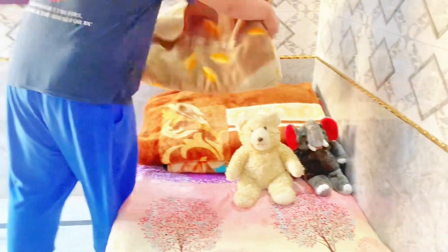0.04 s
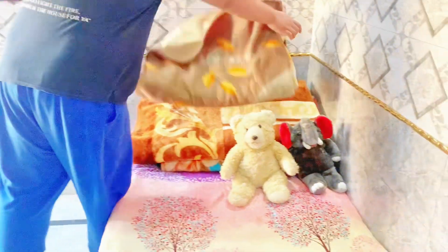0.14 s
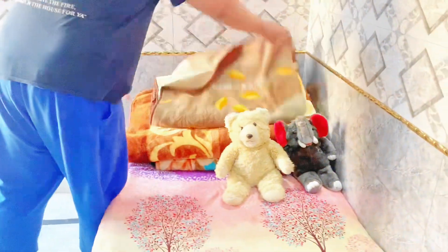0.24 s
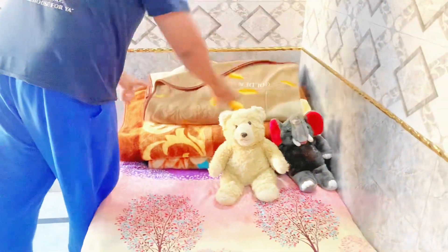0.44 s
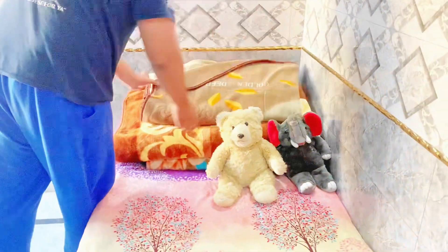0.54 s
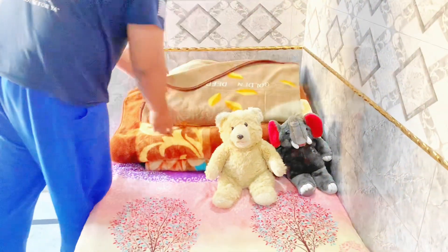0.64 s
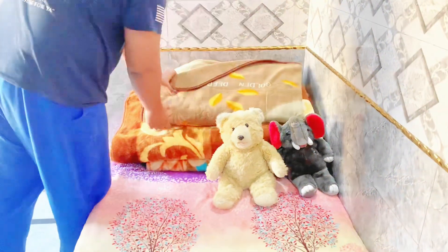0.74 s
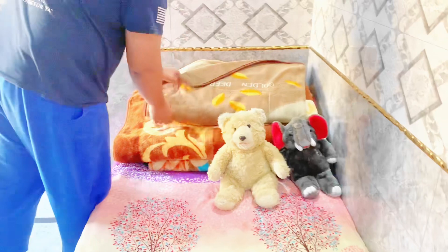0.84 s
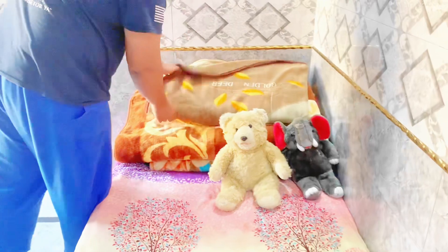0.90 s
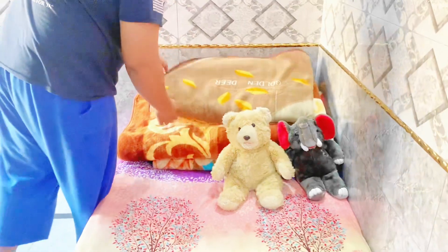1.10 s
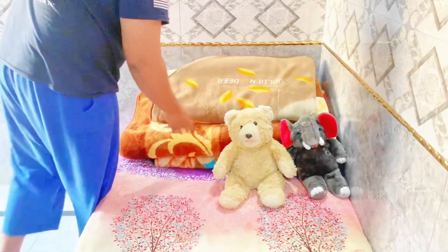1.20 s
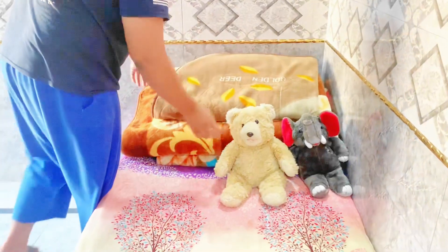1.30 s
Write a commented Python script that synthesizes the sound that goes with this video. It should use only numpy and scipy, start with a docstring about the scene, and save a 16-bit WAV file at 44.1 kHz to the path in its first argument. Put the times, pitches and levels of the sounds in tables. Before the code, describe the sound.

A folded blanket lands on a stack of bedding at about 0.25 seconds, after a faint brush of cloth. It makes a soft, low thump with a brief swish, and a fold flops down more quietly near 0.4 seconds. Hands then rub the fabric faintly, with light scuffs from about 0.9 to 1.3 seconds. A low machine hum and the bedroom's hush continue underneath.

```python
"""Blanket landing on bedding

A folded blanket lands on a stack of bedding in the corner of a quiet tiled bedroom. The trapped air
gives a soft thump that sets bed and room booming, slipping fibres hiss as the cloth settles, and a
last fold flops down. Faint rubbing comes before and after, over a machine's hum and the room's hush."""
import sys
import numpy as np
from scipy import signal
from scipy.fft import rfft, irfft
from scipy.io import wavfile

SR = 44100
rng = np.random.default_rng(int(sys.argv[2]) if len(sys.argv) > 2 else 0)


def int16_out(signal):
    """Quantize to a 16-bit WAV file."""
    q = np.round(np.clip(np.atleast_2d(signal).T, -1, 1) * 32767)
    wavfile.write(sys.argv[1], SR, q.astype(np.int16))


N = 59535
T = np.arange(N) / SR

# spectrum of the cloth's finest friction noise: frequency_hz, relative_db
FIZZ_SPECTRUM = [(500, -35), (3000, -24), (8500, -3), (10200, 1), (11500, -4), (13000, 2), (13700, 4),
                 (14200, -6), (15800, -9)]


def amp(db):
    """Amplitude ratio of a level in decibels."""
    return 10 ** (np.asarray(db) / 20)


def unit(x):
    """Normalisation to an rms of 1."""
    return x / np.sqrt(np.mean(x ** 2) + 1e-20)


def spectrum_db(points, hz):
    """Interpolation of a spectrum on a logarithmic frequency axis."""
    frequencies, db = np.transpose(points)
    return np.interp(np.log(hz + 1), np.log(frequencies + 1), db)


def bands_db(bands, hz):
    """Gaussian peaks or dips of a frequency response, summed in decibels."""
    return sum(db * np.exp(-((hz - centre) / width) ** 2) for centre, width, db in bands)


def colour(x, db_at):
    """Zero-phase filtering by a gain in decibels at each frequency."""
    hz = np.fft.rfftfreq(2 * N, 1 / SR)
    return irfft(rfft(x, 2 * N) * amp(db_at(hz)))[:N]


def swell(peak_s, rise_s, fade_s):
    """Gaussian envelope with separate widths before and after its peak."""
    return np.exp(-((T - peak_s) / np.where(T < peak_s, rise_s, fade_s)) ** 2)


def drift(top_hz):
    """Superposed slow sinusoids wander at random, with an rms of about 1."""
    rate, phase = rng.random((2, 16, 1))
    return np.sin(2 * np.pi * (top_hz * rate * T + phase)).sum(0) / np.sqrt(len(rate) / 2)


def friction(spectrum, hiss_share):
    """Shot noise: countless tiny fibre slips share their power with an even hiss."""
    slips_per_s, spread_db = 5500, 3.5
    slips = (rng.random(N) < slips_per_s / SR) * rng.choice([-1., 1.], N)
    slips *= amp(spread_db * np.minimum(rng.exponential(1, N), 4))
    drive = np.sqrt(1 - hiss_share) * unit(slips) + np.sqrt(hiss_share) * rng.standard_normal(N)
    return unit(colour(drive, lambda hz: spectrum_db(spectrum, hz)))


def strokes(events, spectrum):
    """Incoherent addition: overlapping swells of noise sum in power."""
    power = sum((amp(db) * swell(peak, rise, fade)) ** 2 for peak, db, rise, fade in events)
    return np.sqrt(power) * friction(spectrum, hiss_share=0.67)


def room(x, t60_s=.3, tail_db=-16):
    """Reverberation: early reflections and a faint, exponentially decaying tail follow the sound."""
    # first reflections from the tiled corner: delay_s, gain_db
    reflections = [(.0023, -15), (.0041, -15), (.0058, -16), (.0087, -16)]
    t = T[:SR // 2]
    tail = rng.standard_normal(len(t)) * (rng.random(len(t)) < .05) * amp(-60 * t / t60_s)
    response = amp(tail_db) * tail / np.linalg.norm(tail)
    response[0] = 1  # direct sound
    for delay, db in reflections:
        response[round(delay * SR)] += amp(db) * rng.choice([-1, 1])
    return signal.fftconvolve(x, response / np.linalg.norm(response))[:N]


def hush(level_db=-49):
    """Stationary ambient noise, strongest in the bass."""
    # background of the room: frequency_hz, relative_db
    spectrum = [(15, -38), (28, -13), (45, 0), (65, -5), (82, -7), (150, -7), (240, -9), (370, -10),
                (460, -16), (700, -20.5), (1100, -18), (1500, -25), (1900, -22.5), (3800, -30.5),
                (4800, -31.5), (5700, -36), (7500, -40.5), (10200, -42), (15500, -53)]
    return amp(level_db) * unit(colour(rng.standard_normal(N), lambda hz: spectrum_db(spectrum, hz)))


def hum(waver_depth=0.45, waver_hz=3.12):
    """Random modulation: a household machine's tones waver in amplitude and phase."""
    # tones of the machine: pitch_hz, rms_level_db
    tones = [(48.8, -49.5), (65.3, -49), (99.6, -56.5), (149.5, -59), (220, -64.5), (299.4, -57.5),
             (340, -65.5), (370, -68), (499.5, -76), (1329, -79.5), (8250, -81)]
    out = np.zeros(N)
    for hz, db in tones:
        waver = 1 + waver_depth * (drift(waver_hz) + 1j * drift(waver_hz))
        carrier = np.exp(2j * np.pi * (hz * T + rng.random()))
        out += amp(db) * unit((waver * carrier).real)
    return out


def hands():
    """Sliding friction of hands and sleeves on the blanket gives midrange noise."""
    # long rubs: peak_s, level_db, rise_s, fade_s
    rubs = [(.015, -54.5, 0.11, 0.074), (.42, -60, 0.39, 0.016), (1.13, -57, 0.25, 0.28)]
    # their dull spectrum: frequency_hz, relative_db
    rub_spectrum = [(150, -15), (400, 11.5), (700, 2.5), (1100, 0), (1550, -1.5), (2000, 0), (3500, -4.5),
                    (5000, -17.5), (8000, -31), (15000, -25)]
    # short scuffs: peak_s, level_db, rise_s, fade_s
    scuffs = [(.93, -53.5, 0.01, 0.02), (1.038, -52.7, 0.02, 0.011), (1.178, -58, .012, .02)]
    # their narrower spectrum: frequency_hz, relative_db
    scuff_spectrum = [(300, -20), (750, -12), (950, 0), (1280, 1), (1550, -11), (2200, -9), (5000, -23),
                      (15000, -50)]
    return strokes(rubs, rub_spectrum) + strokes(scuffs, scuff_spectrum)


def brushing():
    """Light friction of cloth on cloth gives broadband noise."""
    # brushes of cloth: peak_s, level_db, rise_s, fade_s
    brushes = [(.08, -61.5, 0.076, 0.091), (.388, -56.5, 0.0064, 0.014), (.48, -60.5, 0.12, 0.13),
               (1.295, -57, 0.035, 0.025)]
    # their spectrum: frequency_hz, relative_db
    spectrum = [(500, 5.5), (2000, -2), (4000, 2), (7000, -6.5), (10000, -14), (13400, -18), (15800, -20)]
    return strokes(brushes, spectrum)


def flicking():
    """Brief friction gives a crisp fizz as the blanket swings, first touches and is let go."""
    # flicks of the blanket: peak_s, level_db, rise_s, fade_s
    flicks = [(.085, -63, 0.065, 0.08), (.253, -52, .0025, .006), (1.3, -70, .03, .04)]
    return strokes(flicks, FIZZ_SPECTRUM)


def settling(t, attack_s, hold_s, t60_s):
    """Envelope of spreading cloth: linear growth from contact, a hold, then exponential decay."""
    return np.clip(t / attack_s, 0, 1) * amp(-60 * np.maximum(t - attack_s - hold_s, 0) / t60_s)


def weave_resonance(t, start_hz=3350, top_hz=4150, glide_s=.055, width_hz=1700):
    """A broad resonance of the weave: a band of noise whose centre glides upward from contact."""
    def lowpass_db(hz):
        return -10 * np.log10(1 + (2 * hz / width_hz) ** 6)

    real, imaginary = (colour(rng.standard_normal(N), lowpass_db) for _ in range(2))
    centre_hz = np.interp(t, [0, glide_s], [start_hz, top_hz])
    carrier = np.exp(2j * np.pi * np.cumsum(centre_hz) / SR)
    return unit(((real + 1j * imaginary) * carrier).real)


def rustle(contact_s=.2495, swish_db=-42.5, fizz_db=-48.5, weave_db=-46.3):
    """Friction excites resonances as the blanket settles: a swish with a rising core, under a fizz."""
    # broad shape of the swish: frequency_hz, relative_db
    spectrum = [(150, 6.5), (400, 7), (750, -3), (1100, -3.5), (1900, -6), (2700, -2), (4700, -10.5),
                (5700, -4.5), (7400, -9.5), (8100, -3.5), (8700, -25), (10000, -1.5), (12000, -30),
                (15800, -20)]
    # its narrow resonances: centre_hz, width_hz, gain_db
    resonances = [(3245, 40, 5), (3760, 40, 10), (3935, 40, 7), (4530, 40, 7), (5045, 80, 3)]
    t = T - contact_s
    swish = unit(colour(friction(spectrum, hiss_share=0.89), lambda hz: bands_db(resonances, hz)))
    swish *= settling(t, attack_s=.022, hold_s=.031, t60_s=.29)
    fizz = friction(FIZZ_SPECTRUM, hiss_share=0.7) * settling(t, attack_s=.02, hold_s=.044, t60_s=.26)
    weave = weave_resonance(t) * settling(t, attack_s=.028, hold_s=.027, t60_s=.17)
    return amp(swish_db) * swish + amp(fizz_db) * fizz + amp(weave_db) * weave


def escaping_air():
    """Flow noise: air leaves from under the cloth in low puffs."""
    # puffs of air: peak_s, level_db, rise_s, fade_s
    puffs = [(.264, -43, 0.005, 0.008), (.297, -47, .008, .02), (.363, -44, 0.012, 0.009),
             (.412, -51, .007, .009)]
    # their spectrum: frequency_hz, relative_db
    spectrum = [(100, -18), (250, -2), (340, 7.5), (430, 1), (560, -12), (900, -23), (3000, -35)]
    return strokes(puffs, spectrum)


def thumps(boom_rise_s=0.007):
    """Modal excitation: each push of squeezed air glides in pitch and sets bed and room ringing."""
    # landings and sinkings: peak_s, pitch_hz, level_db, rise_s, fade_s, relative_glide_per_s
    landings = [(0.2522, 148, -10.2, 0.0072, 0.0058, 25), (0.2714, 110, -17.6, 0.01, 0.0021, 25),
                (.307, 119, -32, .024, .036, 5), (0.368, 166, -28.5, 0.014, 0.008, 6),
                (.392, 135, -38, .012, .015, -8)]
    # modes of bed and room: pitch_hz, relative_db, t60_s
    modes = [(52, -21, .6), (116, -19, .45), (152, -15, .087), (171, -9.5, .1), (243, -8, .054)]
    out = np.zeros(N)
    for peak, hz, db, rise, fade, glide in landings:
        t = T - peak
        push = -swell(peak, rise, fade) * np.sin(2 * np.pi * hz * (t + glide * t ** 2 / 2))
        age = np.maximum(t, 0)
        boom = sum(amp(level - 60 * age / t60) * np.sin(2 * np.pi * f * age) for f, level, t60 in modes)
        build_up = 1 - np.exp(-age / boom_rise_s)
        out += amp(db) * (push + build_up * boom)
    return out


def scene():
    """Superposition: hush and friction reverberate, while hum, puffs and thumps add directly."""
    background = hum() + room(hush() + hands())
    cloth = room(brushing() + flicking() + rustle())
    return (background + cloth + escaping_air() + thumps())[None]


def record(dry, cutoff_hz=15750):
    """The microphone's frequency response notches the treble, and a low-pass filter limits the band."""
    # narrow dips in the response: centre_hz, width_hz, gain_db
    dips = [(11870, 200, -17), (15000, 280, -19)]
    heard = colour(dry[0], lambda hz: bands_db(dips, hz))
    lowpass = signal.firwin(511, cutoff_hz, window=("kaiser", 9), fs=SR)
    return signal.fftconvolve(heard, lowpass, "same")[None]


dry = scene()
out = record(dry)
int16_out(out)
```